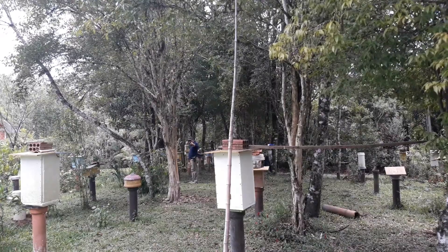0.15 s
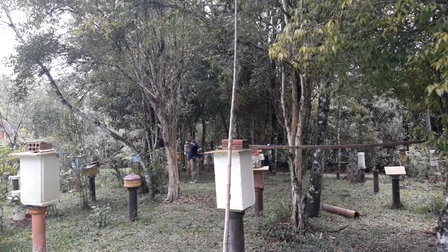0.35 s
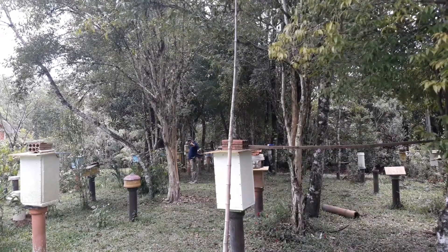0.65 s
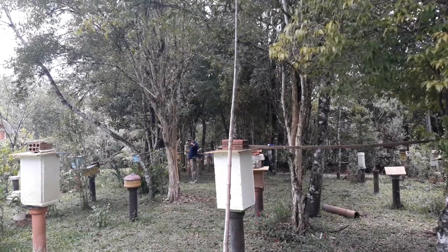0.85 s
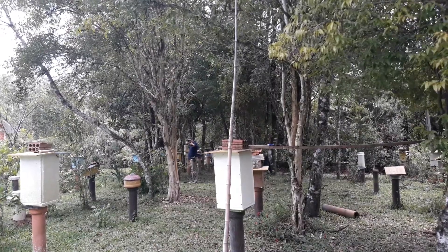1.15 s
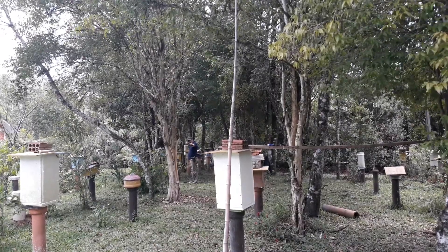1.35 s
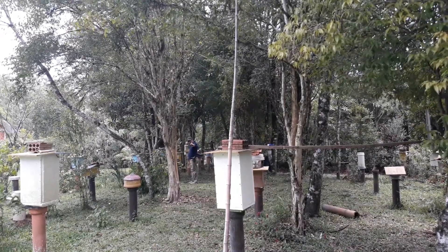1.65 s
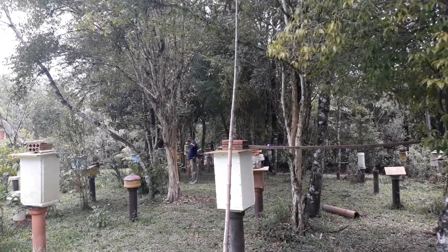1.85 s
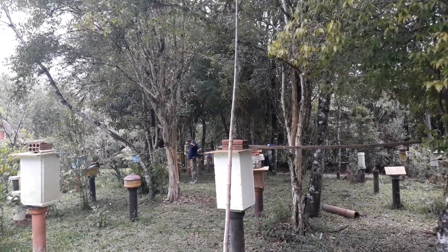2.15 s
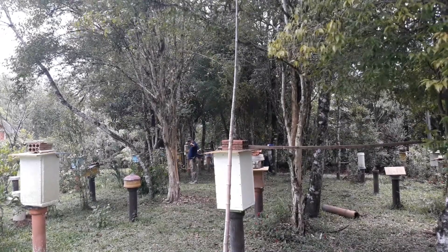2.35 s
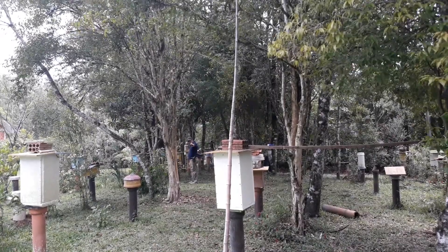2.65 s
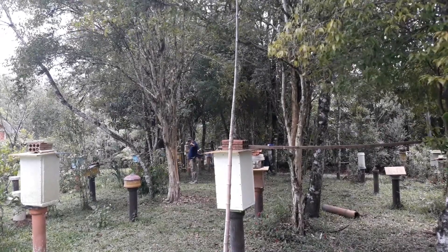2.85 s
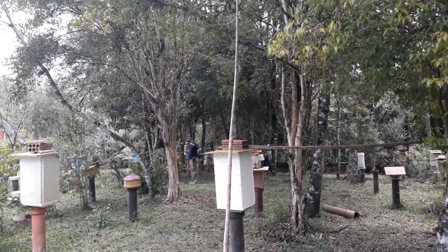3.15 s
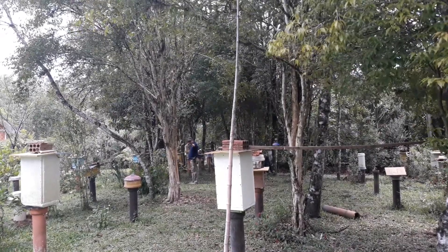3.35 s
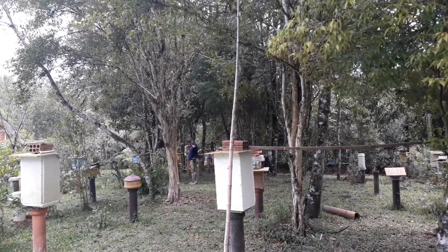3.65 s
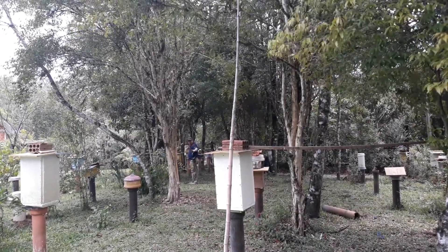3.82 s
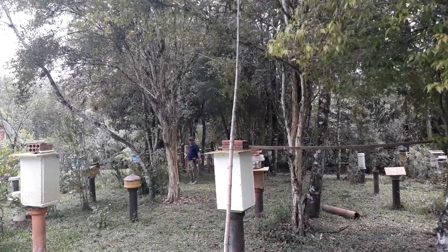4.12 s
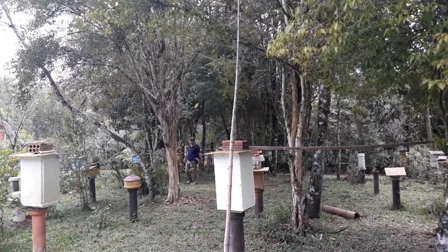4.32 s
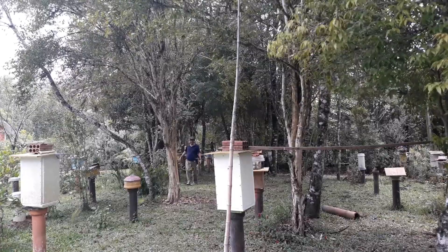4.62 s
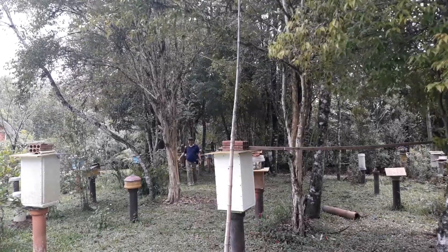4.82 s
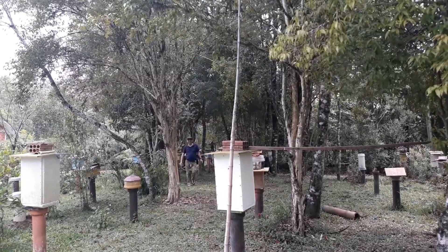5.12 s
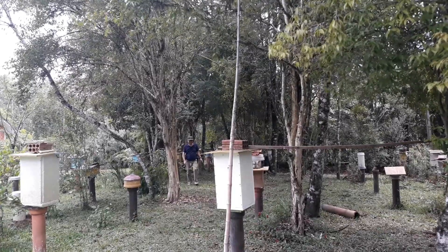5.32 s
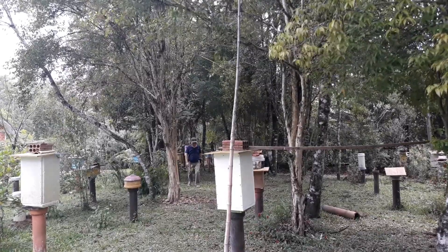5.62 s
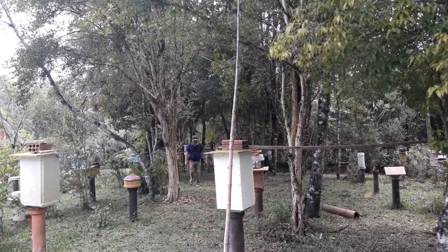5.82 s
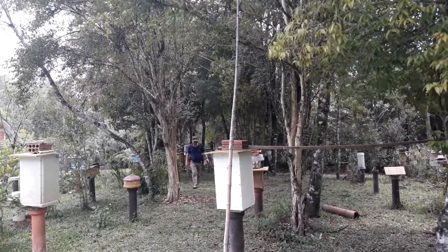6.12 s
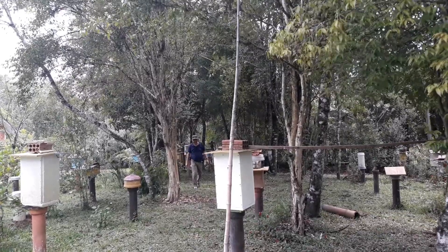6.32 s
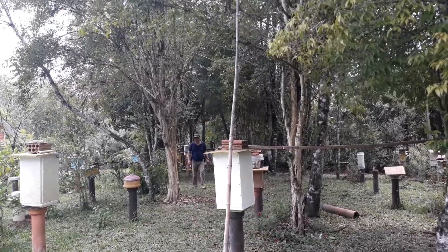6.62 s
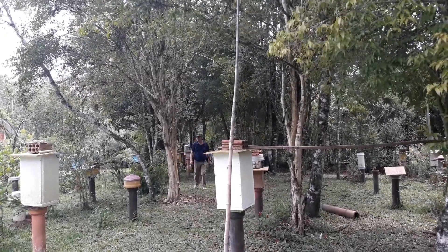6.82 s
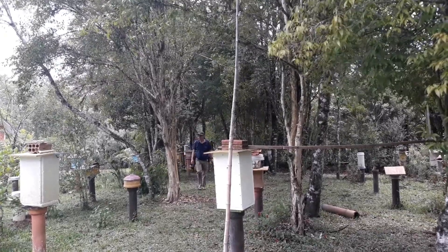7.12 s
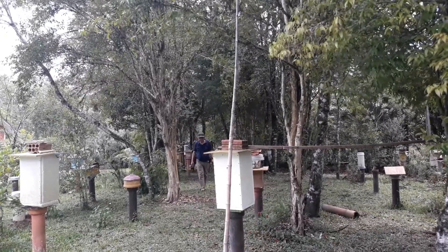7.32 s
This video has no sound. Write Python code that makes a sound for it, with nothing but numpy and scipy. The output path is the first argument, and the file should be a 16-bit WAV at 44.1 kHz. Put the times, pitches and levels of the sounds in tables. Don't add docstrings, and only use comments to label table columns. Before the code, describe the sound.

Outdoors among trees, a steady soft leaf hiss with low wind puffs on the microphone. Just after three seconds a slingshot band snaps, and at once a stone cracks very loudly on a nearby wooden box, with a short echo off the trunks and tiny skipping ticks. Wind thumps strengthen around five seconds, then a more distant woody knock and a faint tap follow near six.

```python
import sys
import numpy as np
from scipy import signal
from scipy.fft import rfft, irfft
from scipy.io import wavfile
from scipy.ndimage import uniform_filter1d

SR = 44100
rng = np.random.default_rng(int(sys.argv[2]) if len(sys.argv) > 2 else 0)


def unload_audio(sound):
    columns = np.transpose(np.atleast_2d(sound))
    steps = np.round(np.clip(columns, -1, 1) * 32767)
    wavfile.write(sys.argv[1], SR, steps.astype(np.int16))


def decibels_to_gain(level_db):
    exponent = np.asarray(level_db, float) / 20
    return 10 ** exponent


N = 329427

SNAP_S, NEAR_S, FAR_S, POST_S = 3.2834, 3.4052, 6.0556, 6.425
# delay/ms, peak level/dB, centre f/Hz, width/octaves, decay/ms
SNAP_PARTS = [
    (0, -13, 9500, 2.4, 2.42),
    (.1, -14, 4900, .6, 3),
    (.8, -27, 3300, .2, 4),
]
NEAR_PARTS = [
    (0, -7.5, 2600, 2.2, 5.35),
    (.3, -8, 4750, .4, 2.5),
    (.5, -3, 11500, 1.0923, 1.456),
    (3.1638, -6, 1900, .5, 3),
    (4.8009, -22, 4750, .35, 51.9),
    (4.761, -22, 1400, .7, 22.2),
    (8.8, -17.5, 9486, 0.3054, 8.96),
    (27.747, -16.5, 9270, 0.495, 3.755),
    (60, -29, 4832, 0.3614, 47.2),
    (74, -27, 431.8, .3, 18),
]
FAR_PARTS = [
    (0, -11, 2700, 1.8, 3),
    (6.8, -10.5, 1120, .45, 11),
    (7.386, -16, 3049, 0.642, 8.9),
    (12.4, -17, 3500, .8, 16),
    (24, -16, 2450, .7, 13.7),
    (25.522, -18, 6000, .5, 6.13),
    (39.019, -22, 2408, 1.112, 11.96),
]
POST_PARTS = [
    (0, -17.5, 5200, 1.5, 2.96),
    (1, -20, 2500, 1.0, 24),
    (13, -25, 1500, 1.2, 16),
]
# t/s, peak
# level/dB, centre f/Hz, decay/ms
TICKS = [(3.2836, -20, 14000, 1.98), (3.3153, -20, 13000, 1.602), (3.3465, -31.5, 7000, 3.04),
         (3.5605, -26, 13000, 8), (3.6254, -33, 12000, 4.98), (3.7075, -40, 13000, 4),
         (4.005, -28, 11500, 6), (4.0524, -27, 13000, 6), (4.0876, -41, 12000, 4.06),
         (4.3814, -33, 10000, 4.425), (4.3905, -37, 13000, 4.01), (5.6195, -34, 14000, 4.01),
         (6.056, -21, 11000, 1.995), (6.0741, -27, 5000, 3.99), (6.4243, -30, 13000, 1.5)]
# t/s, peak level/dB, centre f/Hz, width/octaves, decay/ms
PEBBLE_PING = (4, -35, 4300, .4, 10)

# f/Hz, level/dB, t60/s
NEAR_BOX_MODES = [(440.34, -31, 0.572), (929.43, -15, 0.2207), (1310.1, -11.5, 0.2009),
                  (1533.8, -27.5, 0.17), (1756.3, -3.5, 0.0907), (2000, -15, 0.1016), (2204.2, 1, 0.0809),
                  (2430, -21, 0.1264), (2948.6, -11, 0.0856), (4270, -24.5, 0.1108), (4755.7, -18.5, 0.094)]
FAR_BOX_MODES = [(957.45, -2.5, 0.125), (1568.7, 1, 0.1297), (2370, -1.5, 0.2153), (2507.3, 0, 0.2046),
                 (2822.6, -10, 0.203), (2891, -13.5, 0.177), (3226.6, -12.5, 0.1974)]
POST_MODES = [(1624, 1, 0.1126), (1905.2, -16.5, .06), (2492, -17, 0.0596)]

# t/s, level/dB, hold/ms, early t60/s, late share/dB
SCATTER = [
    (3.285, -35, 3.01, 0.2221, -6),
    (3.408, -21.5, 20.53, 0.12626, -7.5),
    (6.058, -27.5, 25.44, .22, -1),
    (6.425, -35, 28.83, 0.432, -6),
]
# f/Hz, level per Hz/dB
SNAP_TAIL = [(1200, -30), (2500, -11), (4500, 2), (6500, -8.5), (8700, 1.5), (10500, -10.5), (16000, -3.5)]
NEAR_TAIL = [(120, -49), (200, -15.5), (432, -1.5), (900, -6.5), (1400, 2.5), (2200, 0), (3310, -7),
             (4700, -4.5), (6200, -12.5), (9230, -6.5), (10500, -14), (16000, -10.5)]
FAR_TAIL = [(180, -41), (300, -9.5), (1340, -5.5), (1580, -6), (2030, -6.5), (2440, -2.5), (3640, -11.5),
            (9090, -19.5), (16000, -34.5)]
POST_TAIL = [(410, -34.5), (700, -5.5), (1310, -10), (1600, -1), (1750, -5), (2770, -9), (8990, -18.5),
             (16000, -42.5)]

# t/s, level/dB
FLOW = [(0.0, -41), (0.3, -45), (0.58, -54), (1.2, -60), (2.2, -55), (3.72, -50), (4.3, -58), (4.35, -42),
        (4.78, -47), (5.03, -36), (5.45, -48), (5.95, -50), (6.07, -40), (6.5, -60), (6.66, -46),
        (7.0, -47), (7.12, -60), (7.47, -50)]
# t/s, peak level/dB, f/Hz,
# length/ms
STRONG_EDDIES = [(0.048, -23.5, 120.6, 8), (0.442, -27, 116, 17), (0.471, -30, 170, 5.4),
                 (.915, -33, 225, 20), (1.671, -32.5, 138.8, 11), (2.636, -35, 114, 14),
                 (2.867, -32, 105, 12), (3.307, -21, 143.4, 5.5), (3.407, -23, 170, 5),
                 (3.723, -29.5, 125, 6.7), (4.34, -25.5, 129.1, 9), (4.367, -28.5, 140.2, 4.6),
                 (4.415, -31, 106, 10), (4.495, -26.5, 126.4, 7.6), (4.535, -28, 145, 16),
                 (4.594, -27, 115.2, 9), (4.837, -25.5, 105.6, 16), (4.901, -17.5, 135, 6),
                 (4.959, -22.5, 121.2, 6.8), (4.981, -19.5, 106, 9), (5.024, -27, 113, 10),
                 (5.064, -16, 144.6, 7), (5.116, -22.5, 116.9, 9.3), (5.192, -25.5, 127.1, 7),
                 (5.327, -23.5, 112.9, 7.8), (5.629, -25, 106.5, 12), (6.348, -23, 120, 7),
                 (6.675, -30, 88, 18), (6.832, -29.5, 119.6, 7.7), (6.962, -28.5, 95, 22)]

# t/s, level/dB
BREEZE = [
    (0, -35),
    (.7, -36),
    (2.3, -37),
    (3.3, -38),
    (5.4, -40),
    (6.1, -40.5),
    (7.47, -41),
]
# f/Hz, level per Hz/dB
LEAF_COLOUR = [(18, -49), (30, -22.5), (59, -4), (100, -11.5), (138, -6), (227, -1.5), (384, -4), (740, -4),
               (1250, -9), (1960, -8.5), (6550, -18.5), (9400, -19), (10200, -24.5), (15500, -26.5)]
# f/Hz, width/Hz, level/dB
PORT_MODES = [(2051, 412, 1), (4803.5, 1341, 1), (8769, 929.7, 2)]


def contacts():
    out, u = np.zeros(N), np.arange(4096) / SR
    hz = np.fft.rfftfreq(len(u), 1 / SR) + 1
    for s, db, centre_hz, octaves, decay_ms in touches():
        band = bell_gain(centre_hz, octaves)
        click = np.roll(irfft(band(hz)), 30)
        rise = 1 - np.exp(-u / 0.0003582)
        grit = rise * fall(u, 0.004463 * decay_ms) * coloured(band, len(u))
        burst = grit / np.max(abs(grit)) + 1.8023 * click * fall(u, 0.02618) / np.max(click)
        add(out, s, decibels_to_gain(db) * burst / np.max(abs(burst)))
    return out


def touches():
    impacts = [(SNAP_S, SNAP_PARTS), (NEAR_S, NEAR_PARTS), (FAR_S, FAR_PARTS), (POST_S, POST_PARTS)]
    rows = [(s + ms / 1000, *rest) for s, parts in impacts for ms, *rest in parts]
    for k in range(4):
        rows.append((NEAR_S + (50 + 33 * k) / 1000, -20 - 3.5 * k, 2000, .7, 34))
    for s, db, hz, ms in TICKS:
        octaves = 0.417 + 1.955 * np.log2(16020 / hz)
        rows.append((s, db, hz, octaves, ms))
    return rows + [PEBBLE_PING]


def boxes():
    out = np.zeros(N)
    ring(out, 3.4094, -8.5, NEAR_BOX_MODES, rattle_ms=0.274)
    ring(out, 6.078, -26.0, FAR_BOX_MODES, rattle_ms=1.109)
    ring(out, 6.456, -38, POST_MODES, rattle_ms=0.296)
    ring(out, 6.47, -32, POST_MODES, rattle_ms=0.4176)
    return out


def ring(out, s, db, modes, rattle_ms):
    u = np.arange(16384) / SR
    push = np.gradient(rng.standard_normal(len(u)) * np.exp(-u * 1000 / rattle_ms))
    body = 0
    for hz, mode_db, t60 in modes:
        pole = 2j * np.pi * hz + np.log(1000) / t60
        share = abs(push @ np.exp(pole * np.minimum(u, .03)))
        body = body + decibels_to_gain(mode_db) * fall(u, t60) * np.sin(2 * np.pi * hz * u) / share
    add(out, s, decibels_to_gain(db) * signal.fftconvolve(body, push))


def scatter():
    out, u = np.zeros(N), np.arange(32768) / SR
    tails = (SNAP_TAIL, NEAR_TAIL, FAR_TAIL, POST_TAIL)
    late_t60 = 0.6727
    for (s, db, hold_ms, early_t60, late_db), tail in zip(SCATTER, tails):
        after = np.maximum(u - hold_ms / 1000, 0)
        decay = fall(after, early_t60) + decibels_to_gain(late_db) * fall(u, late_t60)
        shape = (1 - np.exp(-u / 0.00315)) * decay
        patchy_db = db + 0.929 * walk(170)[:len(u)]
        add(out, s, decibels_to_gain(patchy_db) * shape * coloured(table_gain(tail), len(u)))
    return out


def buffet(t):
    flow_db = np.interp(t, *np.transpose(FLOW)) + 2.29 * walk(30) - 0.5
    out = coloured(bell_gain(88.905, 1.2686), N) * decibels_to_gain(flow_db)
    u = np.linspace(-.06, .06, int(.12 * SR))
    puffs = eddies()
    phases = rng.uniform(0, 2 * np.pi, len(puffs))
    for (s, db, hz, ms), phase in zip(puffs, phases):
        spread = (u * 1000 / ms) ** 2
        swell = 0.8737 * np.exp(-2.8 * spread) + 0.0831 * np.exp(-.3 * spread)
        puff = swell * np.cos(2 * np.pi * hz * u + phase)
        start = s + u[0]
        before_start = max(int(-start * SR), 0)
        add(out, start, decibels_to_gain(db) * puff[before_start:])
    return out


def eddies():
    per_s, over_flow_db, spread_db = 24, 7, 4
    centre_hz, spread_octaves, turns = 108, .25, 1.4
    jitter, strength, pitch = rng.standard_normal((N * per_s // SR, 3)).T
    at = np.clip((np.arange(len(jitter)) + .5 + jitter / 2) / per_s, 0, N / SR)
    db = np.interp(at, *np.transpose(FLOW)) + over_flow_db + spread_db * strength
    hz = centre_hz * 2 ** (spread_octaves * pitch)
    return np.r_[STRONG_EDDIES, np.c_[at, db, hz, 1000 * turns / hz]]


def leaves(t):
    breeze_db, ducked = np.interp(t, *np.transpose(BREEZE)), duck(t)
    db = breeze_db - 6 * ducked
    tilt = 0.1329 * (breeze_db + 37) + 0.2 * ducked
    spectrum = rfft(coloured(table_gain(LEAF_COLOUR), N))
    hz = np.maximum(np.fft.rfftfreq(N, 1 / SR), 1)
    octave = np.clip(np.log2(hz / 40), 0, 9)
    out = 0
    for k in range(10):
        share = np.clip(1 - abs(octave - k), 0, 1)
        band_db = db + tilt * (k - 5) + 0.4192 * walk(6) + 0.3704 * walk(25)
        out = out + decibels_to_gain(band_db) * irfft(spectrum * share, N)
    return out


def duck(t):
    start_s, attack_s, hold_s, release_s = 3.4294, 0.2167, 1.0592, 0.2281
    after = np.maximum(t - start_s, 0)
    return (1 - np.exp(-after / attack_s)) * np.exp(-np.maximum(after - hold_s, 0) / release_s)


def unit(x):
    return x / np.sqrt(np.mean(x ** 2))


def coloured(gain_of_hz, size):
    hz = np.maximum(np.fft.rfftfreq(size, 1 / SR), 1)
    return unit(irfft(rfft(rng.standard_normal(size)) * gain_of_hz(hz), size))


def table_gain(table):
    f, db = np.transpose(table)
    return lambda hz: decibels_to_gain(np.interp(np.log(hz), np.log(f), db))


def bell_gain(centre_hz, octaves):
    return lambda hz: np.exp(-2 * (np.log2(hz / centre_hz) / octaves) ** 2)


def walk(rate):
    k = int(SR / rate)
    held = np.repeat(rng.standard_normal(N // k + 1), k)
    return unit(uniform_filter1d(uniform_filter1d(held, k), k)[:N])


def fall(t, t60):
    return np.exp(-np.log(1000) * t / t60)


def add(out, s, x):
    i = max(int(s * SR), 0)
    out[i:i + len(x)] += x[:len(out) - i]


def scene():
    t = np.arange(N) / SR
    mono = contacts() + boxes() + scatter() + buffet(t) + leaves(t)
    return np.tile(mono, (2, 1))


def low_pass(x):
    return signal.sosfilt(signal.butter(12, 17000, fs=SR, output="sos"), x)


def record(dry):
    hz = np.fft.rfftfreq(N, 1 / SR) + 1
    port = 1
    for f, width, db in PORT_MODES:
        port = port + (decibels_to_gain(db) - 1) / (1 + 1j * (hz - f * f / hz) / width)
    heard = irfft(rfft(dry) * port, N)
    low_cut = signal.butter(2, 35, "high", fs=SR, output="sos")
    heard = signal.sosfilt(low_cut, heard)
    heard = heard / (1 + (heard / .72) ** 4) ** .25
    top_cut = signal.ellip(12, .3, 60, 15780, fs=SR, output="sos")
    finished = signal.sosfilt(top_cut, heard)
    return low_pass(finished)


dry = scene()
out = record(dry)
unload_audio(out)
```